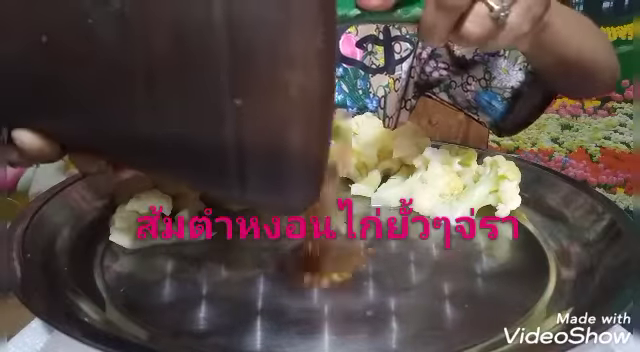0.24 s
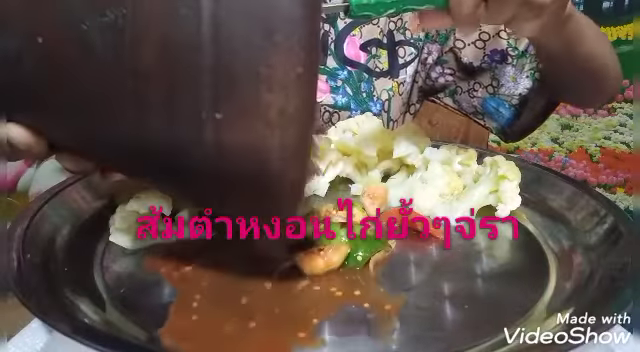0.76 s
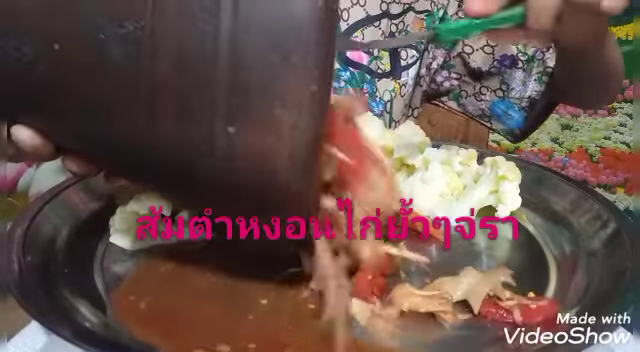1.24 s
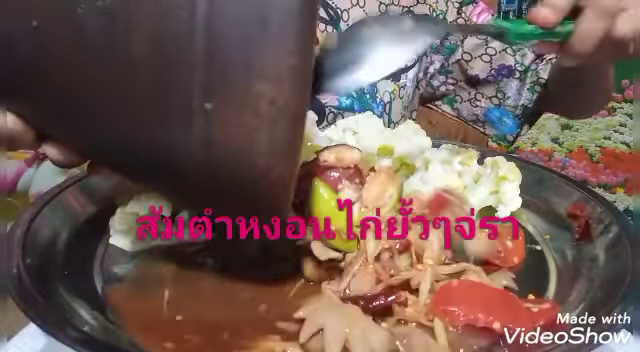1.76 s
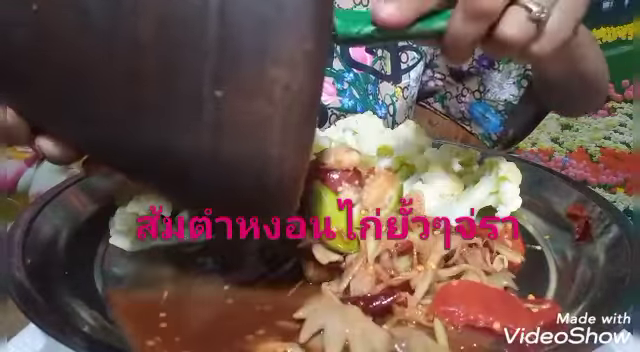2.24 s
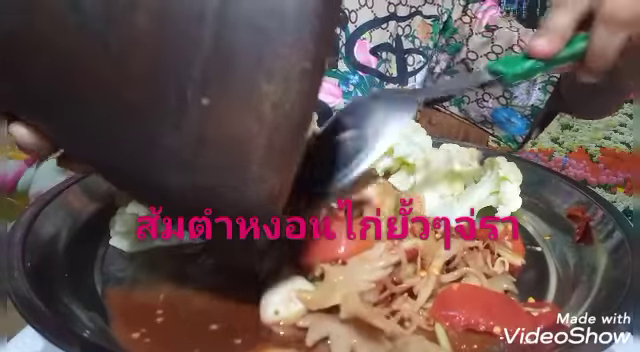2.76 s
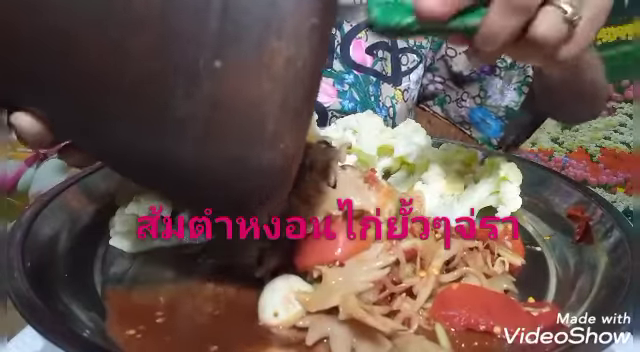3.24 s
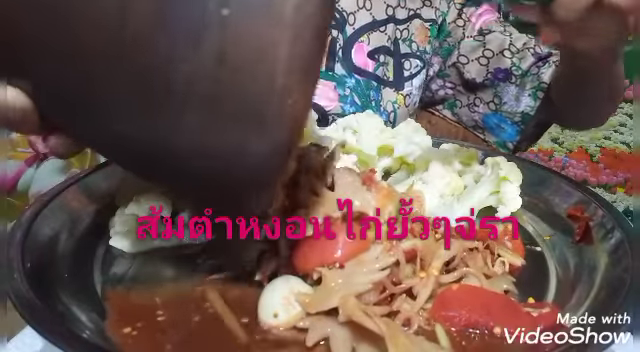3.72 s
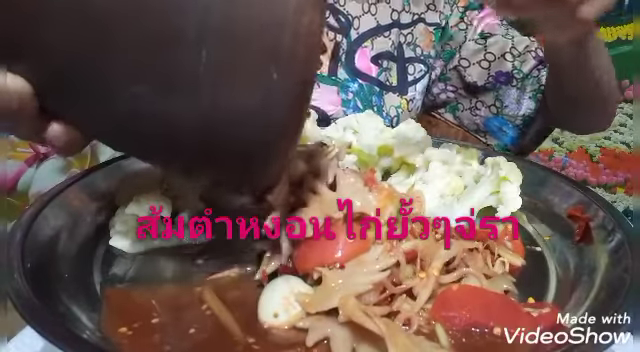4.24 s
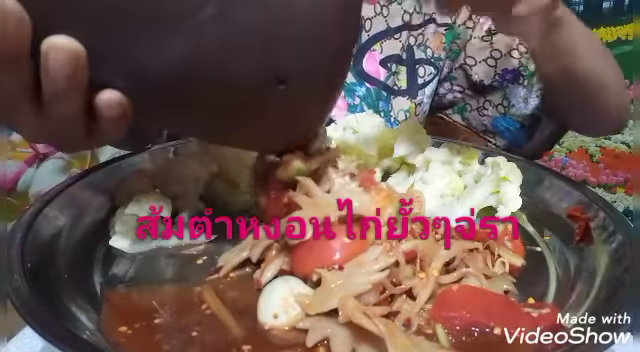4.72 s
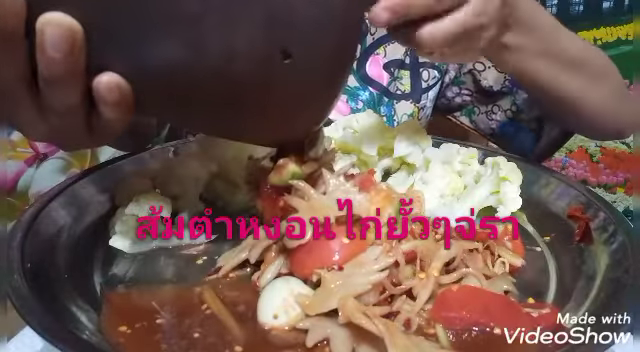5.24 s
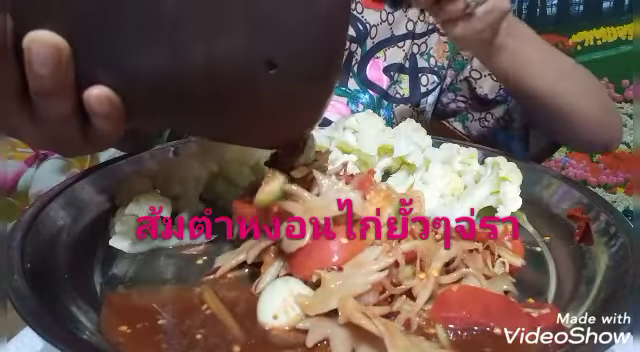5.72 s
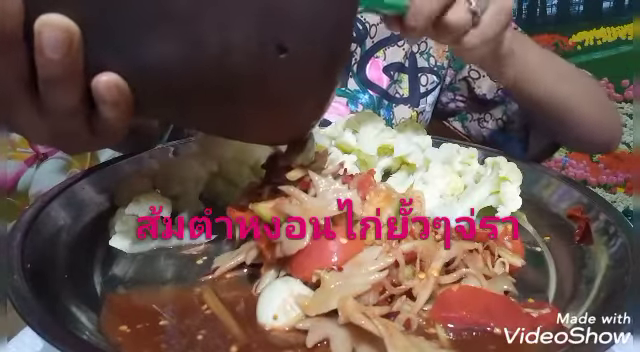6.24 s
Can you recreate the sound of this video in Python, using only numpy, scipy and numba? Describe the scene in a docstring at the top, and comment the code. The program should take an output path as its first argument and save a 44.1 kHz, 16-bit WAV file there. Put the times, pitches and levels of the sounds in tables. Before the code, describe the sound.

Close up in a small room, juicy salad drops onto a metal tray with small wet ticks and soft plops. Then a steel spoon knocks and scrapes inside a clay mortar, lightly hissing at first, then juddering in two loud hollow bursts. A brief rising squeal follows, then shorter scrapes and separate hard knocks. A gusty low rumble and thin hiss stay underneath, in close stereo.

```python
"""A low rumble in gusts and a thin hiss, both shaped noise, fill the room; wet salad ticks and plops on a metal tray.
From two seconds a steel spoon knocks and scrapes along the inside of a clay mortar: noise and jerks drive resonances.
Light strokes hiss and ring the spoon; hard ones judder and boom in the bowl, most of all after three seconds.
Past four seconds the spoon tip sings and the tray rings again; more strokes follow, and single knocks end it."""
import sys
import numpy as np
from scipy import signal
from scipy.fft import rfft, irfft, next_fast_len
from scipy.io import wavfile
from scipy.ndimage import uniform_filter1d
from numba import njit

SR = 44100
rng = np.random.default_rng(int(sys.argv[2]) if len(sys.argv) > 2 else 0)


def waveform_to_disk(signal):
    """Save audio, clipped to [-1, 1], as 16-bit WAV at the path in sys.argv[1]."""
    frames = np.transpose(np.atleast_2d(signal))
    scaled = np.clip(frames, -1, 1) * 32767
    samples = np.round(scaled).astype(np.int16)
    wavfile.write(sys.argv[1], SR, samples)


def convert_level_to_amplitude(level_db):
    """Map a level in decibels to its linear amplitude factor."""
    exponent = np.asarray(level_db, float) / 20
    return 10 ** exponent


N = 285679
T = np.arange(N) / SR  # time of every sample, s

# steady room hiss, relative spectrum: f/Hz, level/dB
AIR_SPECTRUM = [(170, -5.5), (818, -18.5), (4460, -28.5), (5300, -16.5), (6900, -17), (7400, -33),
                (15000, -34)]
# rumble before its gusts: t/s, level/dB
RUMBLE_LEVEL = [(0.0, -71), (0.36, -52.5), (0.76, -62), (0.88, -47), (0.99, -54.5), (1.89, -59),
                (1.95, -47.5), (2.83, -61.5), (3.51, -47), (3.66, -57.5), (3.78, -42.5), (4.15, -49.5),
                (5.35, -45), (6.47, -49)]
# room resonances of the rumble: f/Hz, width/Hz, relative level/dB
RUMBLE_MODES = [(65, 31, -0.5), (81.6, 31.8, 7.5), (148.7, 220, -14)]
# wet ticks of salad and juice: t/s, peak level/dB
WET_TICKS = [(0.156, -43), (0.309, -35), (0.3315, -33.5), (0.393, -35), (0.428, -41), (0.578, -48),
             (0.708, -46.5), (1.022, -43.5), (1.096, -31), (1.315, -34.5), (1.436, -40), (1.4612, -40.5),
             (1.5392, -36), (2.72, -48)]
# heavy pieces landing on the tray: t/s, level/dB
FOOD_PLOPS = [(0.305, -43.5), (0.3311, -40.5), (0.3611, -45.5), (0.394, -52.5), (1.335, -50.5)]
# jolts that ring the tray: t/s, level/dB
TRAY_JOLTS = [(1.54, -59), (4.592, -57.5)]
# ring of the metal tray: f/Hz, relative level/dB, time to fall by 60 dB/s
TRAY_MODES = [(598, -3, .35), (2116, 0, .5), (2180, -1, .5)]
# air in the bowl: f/Hz, width/Hz, relative level/dB
BOWL_MODES = [(623, 154, 1.5), (753, 194, -2)]
# spoon and clay wall: f/Hz, width/Hz, relative level/dB
WALL_MODES = [(1180, 130, -1.5), (1220, 51, 5.5), (1600, 156, 1), (1903, 48, -0.5), (2241, 120, 6),
              (2577, 99, 3.5), (2836, 230, 2.5), (3100, 440, -1)]
# spoon edge: f/Hz, width/Hz, relative level/dB
EDGE_MODES = [(3562, 330, 3.5), (4198, 228, 6), (5040, 300, 1), (5770, 430, 4.5), (6735, 640, 3.5),
              (9090, 340, -2), (10430, 420, 4), (12550, 2600, 0.5), (13900, 2700, -5.5)]
# spoon tip singing on a light stroke: t/s, f/Hz, level/dB
SQUEAL_PATH = [(4.32, 2800, -55), (4.36, 2860, -40), (4.46, 3000, -45)]
# spoon knocking on clay: t/s, wall level/dB, edge level/dB, bowl level/dB, loudest ring f/Hz
SPOON_KNOCKS = [(2.012, -52.5, -42.5, -62, 5500), (2.0323, -45.5, -31, -54, 3600),
                (3.135, -48.5, -50, -62, 1220), (3.489, -28.5, -32, -32, 2800),
                (3.753, -44, -41, -61.5, 5800), (3.801, -33.5, -31.5, -52, 1220),
                (4.5907, -27, -40, -45.5, 1600), (4.796, -38.5, -30, -53.5, 6160),
                (5.0698, -36.5, -55, -52, 1516), (5.09, -32, -42, -43, 1680),
                (5.265, -34, -26.5, -62, 1677), (5.6859, -41, -40.5, -57.5, 2360),
                (6.0299, -29.5, -26.5, -39.5, 3090), (6.339, -39, -32.5, -55.5, 2530)]
# hard jerks where the pressed spoon sticks and breaks free: t/s, peak level/dB
HARD_JERKS = [(3.323, -25.5), (3.330, -26), (3.344, -20.5), (3.353, -17), (3.365, -18), (3.379, -14.5),
              (3.387, -7), (3.395, -9), (3.407, -11), (3.415, -6.5), (3.424, -17.5), (3.945, -13),
              (3.955, -9), (3.963, -7), (3.972, -5), (3.977, -4), (3.990, -9), (4.006, -18), (4.011, -18.5)]
# points along each stroke: t/s, sliding speed as hiss level/dB, pressure/0-1
# the spoon lifts off after the last point
STROKE_POINTS = [
    [(2.064, -47, 0.45), (2.075, -32, 0.03), (2.12, -36.5, 0.22), (2.2, -38.5, 0.43)],
    [(2.235, -53, 0.51), (2.26, -47, 0.67), (2.285, -41.5, 0.7), (2.33, -40, 0.62), (2.37, -43.5, 0.71),
     (2.405, -47, 0.63)],
    [(3.136, -41, 0.25), (3.2, -36.5, 0.18), (3.33, -45.5, 0.5), (3.39, -40, 0.58), (3.425, -48, 0.75)],
    [(3.77, -50, 0.2), (3.84, -44, 0.31)],
    [(3.882, -34.5, 0.22), (3.92, -44, 0.66), (3.94, -32, 0.34), (3.975, -48, 0.77), (4.01, -28.5, 0.44),
     (4.035, -51.5, 0.65)],
    [(4.293, -47.5, 0.3), (4.35, -39.5, 0.26), (4.48, -42.5, 0.19)],
    [(4.878, -51.5, 0.22), (4.95, -50, 0.19)],
    [(5.02, -47, 0.18), (5.04, -44, 0.45), (5.09, -50.5, 0.32)],
    [(5.335, -51.5, 0.36), (5.4, -31, 0.33), (5.47, -34, 0.43), (5.5, -42.5, 0.33)],
    [(5.7, -48.5, 0.25), (5.75, -56.5, 0.51), (5.77, -34.5, 0.42), (5.82, -56.5, 0.37)],
]
# one row per stroke: loudest ring at start f/Hz, at end f/Hz, judder share/0-1, boom over ring at no pressure/dB
STROKE_KINDS = [(6580, 1460, 0, -19), (1600, 1150, 0.2, -14.5), (1220, 2330, 0.01, -16.5),
                (1220, 970, 0.4, -35), (1065, 3360, 0.15, -16), (1220, 3600, 0.3, -30),
                (2850, 4900, 0.23, -16), (1559, 1600, 0.6, -17), (2320, 1500, 0.3, -24),
                (2370, 2400, 0.12, -24)]

AIR_DB = -69.5  # at the start, before slow wandering
TRAY_BLUR = 0.021  # phase flutter that loose food gives the tray's ring, radians per sample
FAVOUR_DB, FAVOUR_WIDTH = 11, .06  # extra drive of modes near the loudest ring, and its relative width
DRIFT = .03  # relative slide of modes as the spoon bends
SKIRT = 1.8  # a second, wider pass keeps the valleys between resonances dark
SQUEAL_WIDTH_HZ = 84
KNOCK_FALL_DB = 8  # wall dB lost per octave from a knock's ring (half of it on strokes)
JERK_RING_HZ = 2270  # the wall mode that hard jerks strike best
JERK_WIDTH_HZ = 257  # the pressed spoon widens the modes to at least this
JERK_TILT = 0.57  # harder jerks are brighter: dB per octave per dB
ECHO_S, ECHO_DB = 0.002666, -11  # the far wall of the bowl throws each jerk back
JUDDER_HZ = 111.3  # typical rate of slips
LIFT_S, LIFT_DB = 0.039, -25  # the sound dies as the spoon lifts off
LIGHT_RING_DB, PRESS_RING_DB = -23, 54  # wall ring over hiss at no pressure, and its rise to full pressure
PRESS_BOOM_DB, BOOM_FULL = 26.5, 0.42  # boom rises per unit of pressure, up to this pressure
LEAD_S = 0.00012  # the left port is nearer
ROOM_T60_S, ROOM_DB, ROOM_LOW_HZ = 0.028, -0.5, 1550  # the room answers the treble most
LATE_T60_S, LATE_DB = 0.3, -37  # faint longer ring of the room, from the start of the tail
DIP_HZ, DIP_WIDTH_HZ = 8240, 1480  # the microphone ports are partly deaf here
MONO_HZ, TOP_HZ = 7190, 15800  # narrower stereo above the first, sharp cut above the second


def level(x):
    """Scale to rms 1."""
    return x / np.sqrt(np.mean(x ** 2))


def even(x):
    """Hold the short-term rms near 1."""
    return x / np.sqrt(uniform_filter1d(x ** 2, size=2600) + 1e-3 * np.mean(x ** 2))


def walk(rate):
    """Random wandering: a new level every 1 / rate s, smoothed twice."""
    k = int(SR / rate)
    steps = np.repeat(rng.standard_normal(N // k + 1), k)
    return 0.96 * uniform_filter1d(uniform_filter1d(steps, k), k)[:N]


def add(out, s, x):
    """Mix x into out from time s."""
    i = int(s * SR)
    out[i:i + len(x)] += x[:N - i]


def band(x, hz, width):
    """Resonance with gain 1 at its centre."""
    return signal.lfilter(*signal.iirpeak(hz, hz / width, SR), x)


def body(x, modes):
    """Sum of fixed resonances (Hz, width Hz, dB), each passed twice for steeper sides."""
    return sum(convert_level_to_amplitude(db) * band(band(x, hz, w), hz, w) for hz, w, db in modes)


@njit
def slide(x, hz, width):
    """Resonance whose centre moves every sample; gain 1 at the centre."""
    y, b, l = np.empty(len(x)), 0., 0.
    for i in range(len(x)):
        g, k = np.tan(np.pi * hz[i] / SR), width / hz[i]
        v = (b + g * (x[i] - l)) / (1 + g * (g + k))
        b, l, y[i] = 2 * v - b, l + 2 * g * v, k * v
    return y


def favour_db(hz, loud_hz):
    """Extra drive of a mode that lies near the loudest ring."""
    return FAVOUR_DB * np.exp(-((hz - loud_hz) / (FAVOUR_WIDTH * hz)) ** 2)


def ring(x, modes, wander_db, loud_hz=1e5, damp=1, fall_db=0):
    """Sum of resonances that slide and are driven unevenly, hardest near loud_hz."""
    out = 0
    for hz, w, db in modes:
        far_db = fall_db * np.abs(np.log2(hz / loud_hz))
        drive_db = db + wander_db * walk(20) + favour_db(hz, loud_hz) - far_db
        drive = 1e-18 + x * convert_level_to_amplitude(drive_db)
        centre = hz * (1 + DRIFT * min(w / 200, 1) * walk(12))
        narrow = slide(drive, centre, 1. * damp * w)
        out = out + slide(narrow, centre, SKIRT * damp * w)
    return out


def air():
    """Steady room hiss with a hump in the treble, swelling slightly with time."""
    hz, db = np.transpose(AIR_SPECTRUM)
    f = np.fft.rfftfreq(N, 1 / SR)
    shape = convert_level_to_amplitude(np.interp(np.log(f + 1), np.log(hz), db)) * (f > 120)
    mid, side = (level(irfft(rfft(rng.standard_normal(N)) * shape, N)) for _ in range(2))
    swell_db = 1.0 * walk(0.63) + 0.34 * T
    return convert_level_to_amplitude(AIR_DB + swell_db) * (mid + 1.29 * side * np.array([[1], [-1]]))


def rumble():
    """Low noise in a few room resonances, coming in short gusts; partly unlike at the two ports."""
    mid, side = (level(ring(rng.standard_normal(N), RUMBLE_MODES, 0.67)) for _ in range(2))
    gust_db = 4.0 * walk(9)
    loudness = convert_level_to_amplitude(np.interp(T, *np.transpose(RUMBLE_LEVEL)) + gust_db)
    return loudness * (mid + 0.64 * side * np.array([[1], [-1]]))


def drops():
    """Dying noise bursts make wet ticks and soft lumpy plops; blurred fading tones ring the jolted tray."""
    out, t = np.zeros(N), T[:int(.4 * SR)]
    for s, db in WET_TICKS:
        wet = rng.standard_normal(len(t)) * (np.exp(-t / 0.0013) + 0.13 * np.exp(-t / 0.06))
        tick = body(wet, ((5800, 5400, 2.0), (10350, 8000, -10.5)))
        add(out, s, convert_level_to_amplitude(db) * tick / np.abs(tick).max())
    for s, db in FOOD_PLOPS:
        wet = rng.standard_normal(len(t)) * np.exp(-t / 0.017)
        thud = body(wet, ((208, 150, 2.5), (476, 110, -3.0), (756, 50, -9)))
        add(out, s, convert_level_to_amplitude(db) * thud / np.sqrt(np.mean(thud[:900] ** 2)))
    for s, db in TRAY_JOLTS:
        for hz, mode_db, t60 in TRAY_MODES:
            flutter = TRAY_BLUR * np.cumsum(rng.standard_normal(len(t)))
            tone = np.sin(2 * np.pi * hz * t + flutter) * 1000 ** (-t / t60)
            add(out, s, convert_level_to_amplitude(db) * convert_level_to_amplitude(mode_db) * tone)
    return out


def squeal():
    """Fine grit keeps one narrow ring of the spoon alive while it slides upward."""
    lift = np.add(SQUEAL_PATH[-1], (LIFT_S, 0, LIFT_DB))
    s, hz, db = np.transpose(SQUEAL_PATH + [lift])
    tone = even(slide(rng.standard_normal(N), np.interp(T, s, hz), 1. * SQUEAL_WIDTH_HZ))
    on = (T > s[0]) & (T < s[-1])
    return convert_level_to_amplitude(np.interp(T, s, db) + 3.4 * walk(40)) * tone * on


def knocks():
    """A sharp blow and a short skid; the modes near the loudest ring are struck hardest."""
    out, t = np.zeros(N), T[:int(.15 * SR)]
    for s, wall_db, edge_db, bowl_db, loud_hz in SPOON_KNOCKS:
        blow, skid = np.exp(-t / 0.00087), 0.039 * np.exp(-(t / 0.03) ** 2)
        push = rng.standard_normal(len(t)) * (blow + skid) * np.minimum(t / 0.0019, 1)
        parts = ((wall_db, WALL_MODES, KNOCK_FALL_DB), (edge_db, EDGE_MODES, 0), (bowl_db, BOWL_MODES, 0))
        for db, modes, fall_db in parts:
            x = 0
            for k, (hz, w, mode_db) in enumerate(modes):
                chance_db = 2.5 * rng.standard_normal()
                far_db = fall_db * abs(np.log2(hz / loud_hz))
                gain = convert_level_to_amplitude(mode_db + chance_db + favour_db(hz, loud_hz) - far_db)
                # neighbouring modes swing in opposite directions
                x = x + (-1) ** k * gain * band(band(push, hz, w), hz, 4 * w)
            add(out, s, convert_level_to_amplitude(db) * x / np.sqrt(np.mean(x[:400] ** 2)))
    return out


def judder():
    """Each hard jerk thumps the bowl and the damped wall, and comes back once from the far side."""
    out, modes = np.zeros(N), np.array(BOWL_MODES + WALL_MODES)
    kick = np.zeros(int(.04 * SR))
    kick[[0, int(ECHO_S * SR)]] = 1, convert_level_to_amplitude(ECHO_DB)
    for s, db in HARD_JERKS:
        x = 0
        for hz, w, mode_db in modes:
            chance_db = 6.3 * rng.standard_normal()
            tilt_db = JERK_TILT * (db - 2.5) * np.log2(hz / 900)
            gain = convert_level_to_amplitude(mode_db + favour_db(hz, JERK_RING_HZ) / 2 + chance_db + tilt_db)
            x = x + gain * band(band(kick, hz, max(w, JERK_WIDTH_HZ)), hz, hz)
        add(out, s, -convert_level_to_amplitude(db) * x / np.abs(x).max())
    return out


def strokes():
    """Grains of clay rasp the spoon all the time; under pressure it also sticks and slips in uneven jerks."""
    grain_db = 3.27 * rng.exponential(size=N) + 1.62 * walk(150) + 2.1 * walk(40)
    grit = level(rng.standard_normal(N) * convert_level_to_amplitude(grain_db))
    slips, fade, loud_hz, share, hiss_db, press, depth_db = np.zeros((7, N))
    loud_hz += 1000  # between strokes
    for rows, (from_hz, to_hz, judder_share, deep_db) in zip(STROKE_POINTS, STROKE_KINDS):
        lift = np.add(rows[-1], (LIFT_S, LIFT_DB, 0))
        s, db, p = np.transpose(rows + [lift])
        on = (T >= s[0]) & (T < s[-1])
        hiss_db[on] = np.interp(T[on], s, db)
        press[on] = np.interp(T[on], s, p)
        loud_hz[on] = np.interp(T[on], s[[0, -2]], [from_hz, to_hz])
        fade[on], share[on], depth_db[on], slips[on] = 1, judder_share, deep_db, 0
        chance = rng.standard_normal((40, 2))  # uneven timing and strength of slips
        gap = np.exp(.15 * chance[:, 0]) / JUDDER_HZ
        slip_s = s[0] + np.cumsum(gap) - gap[0]
        inside = slip_s < s[-1]
        slips[(slip_s[inside] * SR).astype(int)] = convert_level_to_amplitude(2.0 * chance[inside, 1])
    ring_db = hiss_db + LIGHT_RING_DB + PRESS_RING_DB * press
    boom_db = ring_db + depth_db + PRESS_BOOM_DB * np.minimum(press, BOOM_FULL)
    # each slip is a click with a 1 ms tail of grit
    slip_tail = signal.lfilter([1], [1, -np.exp(-1 / (.001 * SR))], slips)
    jerks = slips + .15 * grit * slip_tail
    out = 0
    # reach: jerks carry fully into wall and bowl, little into the edge
    parts = ((hiss_db, EDGE_MODES, .2, 0), (ring_db, WALL_MODES, 1, KNOCK_FALL_DB / 2), (boom_db, BOWL_MODES, 1, 0))
    for db, modes, reach, fall_db in parts:
        rasp = even(ring(grit, modes, 4.0, loud_hz, fall_db=fall_db))
        jerk = even(ring(jerks, modes, 1.2, loud_hz, damp=4.2))  # the pressed spoon rings more briefly
        mix = np.sqrt(1 - reach * share) * rasp + np.sqrt(reach * share) * jerk
        out = out + convert_level_to_amplitude(db) * fade * mix
    return out


def scene():
    """Near sounds reach the left port first; a small room answers differently at each port."""
    # the mortar is too small to radiate bass
    no_bass = signal.butter(4, 460, "high", fs=SR, output="sos")
    mortar = signal.sosfilt(no_bass, strokes() + judder() + knocks() + squeal())
    size = next_fast_len(N + SR)
    f, t = np.fft.rfftfreq(size, 1 / SR), T[:SR // 2]
    decay = 1000 ** (-t / ROOM_T60_S) + convert_level_to_amplitude(LATE_DB) * 1000 ** (-t / LATE_T60_S)
    tails = rng.standard_normal((2, len(t))) * decay * (t > .002)
    tails = convert_level_to_amplitude(ROOM_DB) * tails / np.sqrt(np.sum(tails ** 2, axis=1, keepdims=True))
    direct = np.exp(np.outer([1, -1], 1j * np.pi * f * LEAD_S))
    path = direct + rfft(tails, size) * f / np.hypot(f, ROOM_LOW_HZ)
    dip = 1 - 0.69 * np.exp(-((f - DIP_HZ) / DIP_WIDTH_HZ) ** 2)
    near = irfft(rfft(mortar + drops(), size) * path * dip, size)[:, :N]
    return near + rumble() + air()


def band_limit(x):
    """A steep low-pass at the top of the band."""
    return signal.sosfilt(signal.butter(12, 16830, fs=SR, output="sos"), x)


def record(dry):
    """The stereo width is narrowed, most above MONO_HZ, and the top is cut."""
    mid, side = (dry[0] + dry[1]) / 2, (dry[0] - dry[1]) / 2
    lower = signal.sosfiltfilt(signal.butter(6, MONO_HZ, fs=SR, output="sos"), side)
    side = 0.82 * lower + 0.27 * (side - lower)
    top_cut = signal.ellip(8, .2, 60, TOP_HZ, fs=SR, output="sos")
    out = signal.sosfilt(top_cut, [mid + side, mid - side])
    return band_limit(out)


dry = scene()
out = record(dry)
waveform_to_disk(out)
```